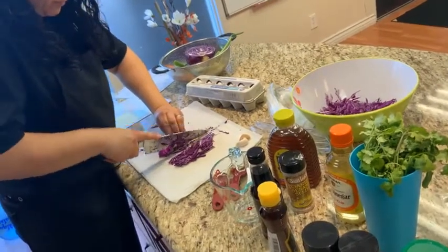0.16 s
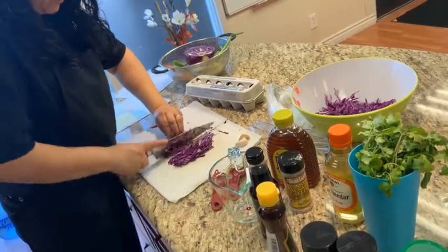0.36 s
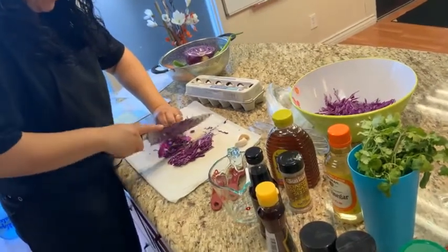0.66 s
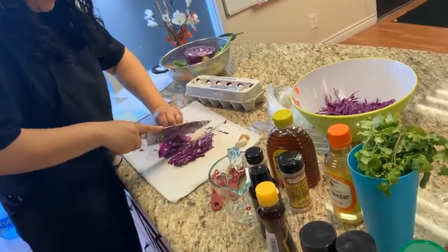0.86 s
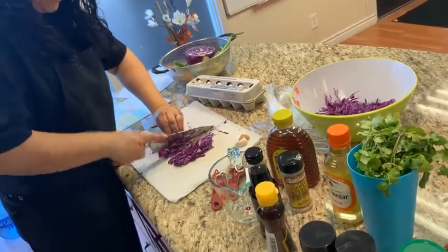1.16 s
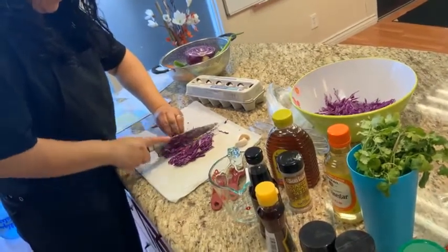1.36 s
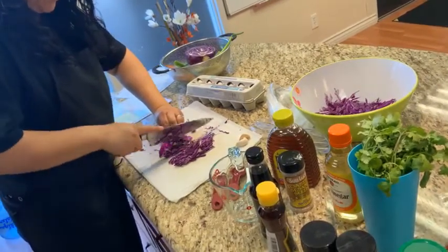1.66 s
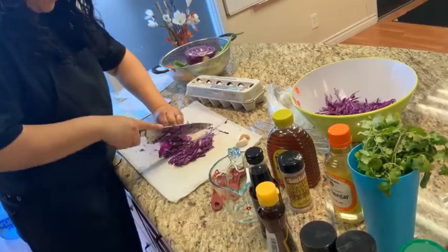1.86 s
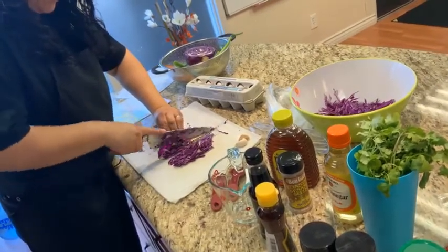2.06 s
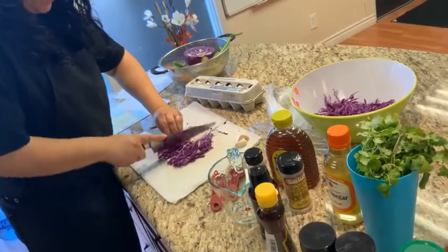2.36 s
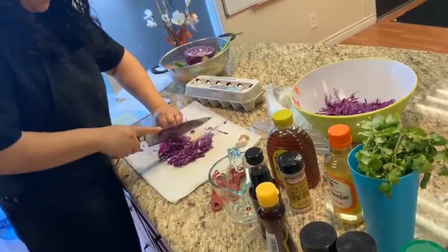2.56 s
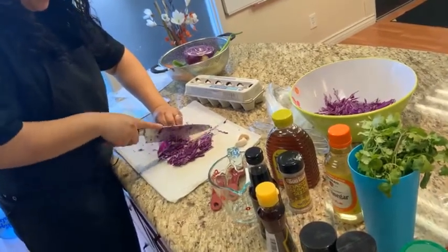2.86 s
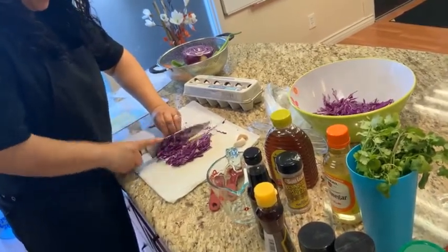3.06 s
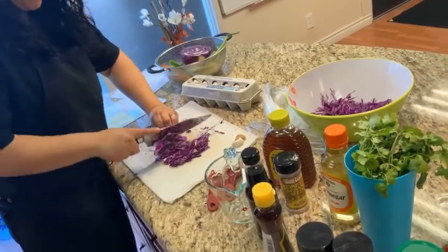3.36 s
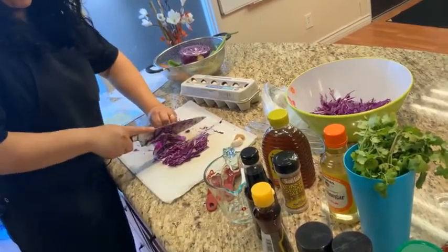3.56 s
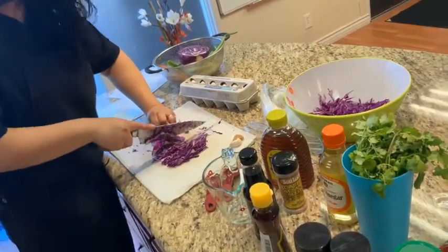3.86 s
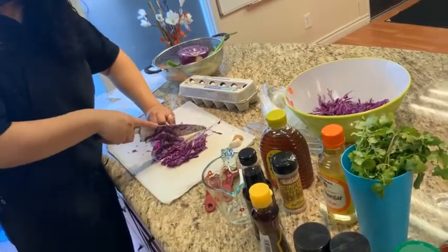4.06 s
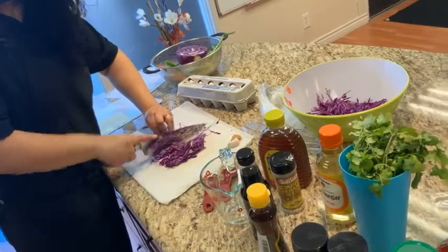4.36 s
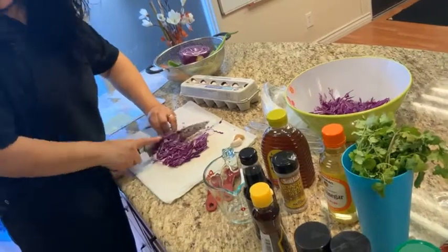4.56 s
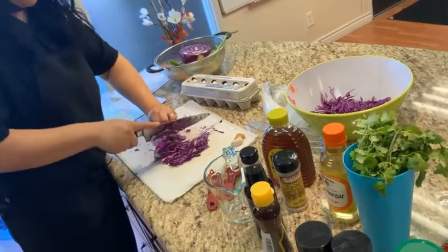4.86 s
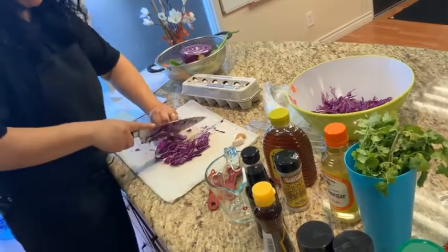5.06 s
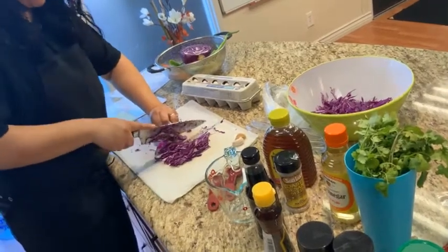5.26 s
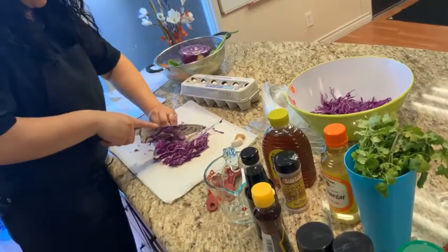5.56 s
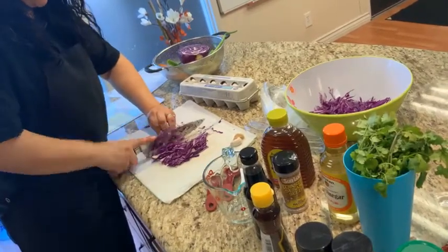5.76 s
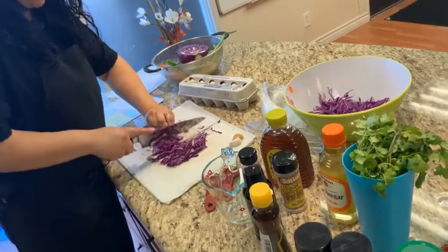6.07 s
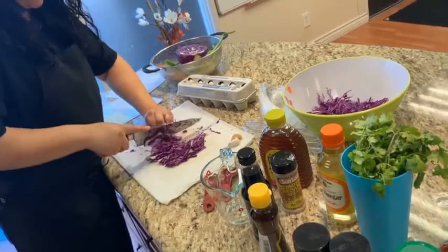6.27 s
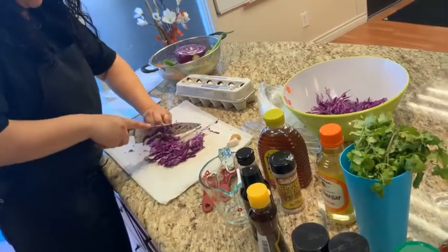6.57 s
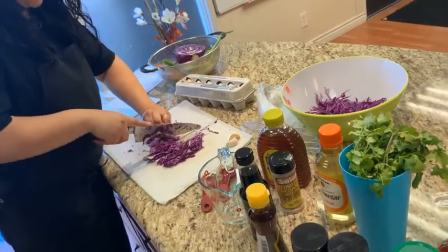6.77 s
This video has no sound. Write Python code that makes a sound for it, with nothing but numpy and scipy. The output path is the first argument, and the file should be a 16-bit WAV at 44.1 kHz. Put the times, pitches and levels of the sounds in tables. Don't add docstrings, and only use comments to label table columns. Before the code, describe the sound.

Close in a small hard-walled kitchen, a chef's knife cuts cabbage on a plastic board. Six short strokes crunch about a second apart, each a dense bright crackle with sharp snaps and dull edge knocks. Loose shreds rustle faintly between them. A fridge rumbles low and steadily throughout, heard on a phone about a metre away.

```python
import sys
import numpy as np
from scipy import signal
from scipy.fft import rfft, irfft
from scipy.io import wavfile
from scipy.ndimage import uniform_filter1d

SR = 44100
rng = np.random.default_rng(int(sys.argv[2]) if len(sys.argv) > 2 else 0)


def undo_db(level):
    steps = np.asarray(level, float) / 20
    return 10 ** steps


def transcribe(u):
    v = np.clip(np.atleast_2d(u).T, -1, 1)
    q = np.round(v * 32767).astype(np.int16)
    wavfile.write(sys.argv[1], SR, q)


N = 305172
T = np.arange(N) / SR

# start in seconds, length in seconds,
# crackle level in dB, change by the end in dB, ribs in dB re the crackle.
PUSHES = [
    (0.163, 0.11, -53.5, 9, -6.5),
    (1.154, 0.083, -48.5, 5, -5),
    (2.1, 0.089, -45, 1, -8),
    (3.003, 0.082, -45, 3, -8),
    (4.325, 0.099, -44, 0, -8),
    (5.699, 0.084, -40.5, 0, -11.5),
]
# start in seconds,
# length in seconds, crackle level in dB, change by the end in dB, ribs in dB re the crackle.
BITES = [(0.0, .016, -61, 4, -10), (0.33, .09, -68, -1, -6), (0.019, 0.082, -50.5, 3.5, -10),
         (0.115, 0.064, -60, 3, -5), (1.021, 0.031, -50, 5, -11), (1.068, 0.13, -53.5, 3, -5.5),
         (1.898, 0.071, -65, 17, -10), (1.976, 0.07, -55.5, -5, -8), (2.047, .055, -59.5, 13.5, -7),
         (2.843, 0.043, -67.5, 11.5, -16), (2.888, 0.038, -49.5, 2.5, -10.5),
         (2.938, 0.071, -54, 5.5, -5.5), (3.99, .012, -51.5, -3, -20), (4.02, 0.017, -43.5, -10, -18),
         (4.122, 0.021, -53.5, -2, -18), (4.164, 0.112, -57.5, 6, -12), (4.281, 0.058, -50.5, 0, -7.5),
         (5.37, 0.067, -70, 15.5, -14), (5.458, 0.11, -65.5, 4, -15), (5.554, .06, -50.5, -4, -13),
         (5.624, 0.068, -63, 10, -12), (5.675, 0.02, -46, 0, -13)]
# centre in Hz, width in Hz, level in dB.
POCKETS = [(6750, 1100, -7), (9500, 1100, -3), (12300, 1600, -2.5), (15300, 1100, 1.5)]
# frequency in Hz, density in dB per Hz.
LEAF_COLOUR = [(3500, -29), (5500, -4.5), (6500, -1.5), (8200, -0.5), (9600, 2), (11000, 0), (12300, 0),
               (15100, 4), (17000, -6.5)]
# frequency in Hz, density in dB per Hz.
RIB_COLOUR = [(1800, -25.5), (3000, -3.5), (3600, -2), (5200, -0.5), (7500, -24.5)]
# frequency in Hz, density in dB per Hz.
BOARD_COLOUR = [(300, -29.5), (700, -6), (1500, -2.5), (2400, -1.5), (3000, -3.5), (5000, -41)]
# start in seconds, peak in dB, colour in
# Hz.
SNAPS = [(0.0193, -33.5, 10600), (0.047, -26, 11900), (0.0846, -33, 10900), (0.175, -29, 9300),
         (0.2487, -31, 10400), (1.023, -35, 12800), (1.0562, -25, 11200), (1.1643, -28.5, 9100),
         (1.219, -30, 11600), (1.9622, -34, 13000), (1.973, -26, 10100), (2.028, -31.5, 10000),
         (2.107, -30.5, 12400), (2.134, -26, 11000), (2.8894, -27.5, 11000), (2.9746, -38, 9400),
         (3.0039, -31, 12200), (3.035, -32, 12300), (3.9964, -32, 11500), (4.0226, -22.5, 10100),
         (4.027, -36, 10000), (4.1246, -37, 12000), (4.282, -33.5, 12600), (4.3262, -26.5, 9500),
         (4.3384, -27, 10700), (4.4126, -28, 10200), (5.5606, -29.5, 11500), (5.608, -37, 10000),
         (5.681, -23, 10600), (5.7137, -26, 11100)]
# start in seconds, peak in dB.
SPLINTERS = [(0.0256, -36), (0.089, -35), (0.1053, -42), (0.2446, -31), (1.032, -39), (1.1675, -35),
             (1.976, -28.5), (2.0779, -40), (2.157, -29), (2.1647, -26), (2.1872, -38), (2.9263, -40),
             (3.0322, -30), (3.077, -33), (3.205, -50), (3.265, -54), (4.1593, -45), (4.211, -34),
             (4.3429, -32), (4.3882, -29), (5.4068, -45), (5.5412, -44), (5.564, -40), (5.5732, -36),
             (5.5844, -38), (5.77, -32), (5.7856, -43), (6.5373, -45)]
# start in seconds, peak in dB, colour in Hz.
TICKS = [(0.3714, -58, 7380), (0.728, -38, 10200), (0.7336, -39, 13100), (0.7871, -42, 10700),
         (0.8515, -42, 9500), (0.8994, -54, 9540), (0.9398, -49, 9000), (0.9804, -47, 9500),
         (1.6489, -47, 10300), (1.7689, -42.5, 12000), (1.863, -31.5, 10000), (2.577, -54, 8290),
         (2.7445, -51, 10300), (2.7871, -48, 9250), (2.864, -47, 10400), (3.5102, -42.5, 11200),
         (3.7791, -52, 12900), (4.14, -37, 7900), (4.2305, -37, 11200), (4.6115, -51, 8700),
         (5.4209, -37, 12600), (5.4932, -45, 11700), (5.9481, -45, 12000), (5.9868, -50, 9220),
         (6.1987, -54, 8700), (6.2297, -49, 9580), (6.5231, -41, 11200), (6.5942, -42.5, 9800),
         (6.769, -50, 5700), (6.801, -50, 11300)]
# start in seconds, peak in dB, flexing frequency in Hz.
KNOCKS = [(0.0797, -37, 2330), (0.1119, -34.5, 1740), (0.1744, -40, 2230), (0.2652, -37.5, 1890),
          (0.375, -42, 1570), (1.0561, -30, 1420), (1.167, -49, 1440), (1.2398, -41, 1590),
          (1.2464, -40, 1560), (1.976, -30.5, 1780), (2.1771, -45, 1170), (2.232, -46, 1290),
          (2.864, -49, 1400), (2.9312, -34.5, 1730), (3.0053, -54, 2090), (3.0713, -42, 1570),
          (4.048, -44.5, 1670), (4.1393, -34.5, 1790), (4.283, -43, 1690), (4.3257, -47, 2970),
          (4.4162, -46, 1400), (4.681, -46.5, 1130), (5.5345, -47.5, 1730), (5.56, -39, 1060),
          (5.758, -49, 1190), (5.7931, -37.5, 2000), (5.947, -51, 1120), (5.9918, -46, 1200)]
# start in seconds, end in seconds, centre in Hz, rms level in dB.
GROANS = [
    (5.70, 5.82, 296, -51.5),
    (3.0, 3.1, 570, -56.5),
    (4.32, 4.44, 514, -57),
]
# start in seconds, length in seconds,
# crackle level in dB, change by the end in dB, colour in Hz.
RUSTLES = [(0.714, 0.018, -65.5, 4, 9000), (0.76, 0.31, -74.5, 9, 10100), (1.61, .045, -81, 8, 9000),
           (1.66, .09, -79, -2, 13000), (1.757, .022, -66, -2, 13500), (1.804, 0.081, -73, 6, 11000),
           (2.571, 0.014, -64.5, -0.5, 8500), (2.612, 0.14, -82, -1, 12000), (2.741, 0.029, -69, 0, 11000),
           (2.781, 0.016, -64.5, 0, 9500), (3.48, 0.036, -77, 8, 11000), (3.55, 0.29, -81.5, 8, 12000),
           (3.868, .12, -79, 10.5, 10000), (4.055, 0.066, -63, -5, 13000), (4.6, .1, -73.5, 1, 5970),
           (4.72, 0.48, -81, -2, 13000), (5.22, 0.19, -86, 12, 10000), (5.938, .055, -72, 0, 13000),
           (6.056, 0.2, -87, 13, 11000), (6.273, .18, -85, -2, 13500), (6.46, 0.063, -77, 15, 12500),
           (6.523, 0.1, -66.5, -6, 12000), (6.627, 0.16, -75.5, -5, 11000), (6.79, .022, -68, -2, 14000)]
# frequency in Hz, density in dB per Hz.
AIR_COLOUR = [(22, -29.5), (45, -23), (90, -6.5), (150, -15.5), (200, -20.5), (500, -24), (750, -34),
              (1300, -37.5), (1600, -42), (4000, -51.5), (5800, -58), (7600, -64.5), (9600, -72),
              (15500, -66)]
# frequency in Hz, width in Hz, rms level in dB.
ROOM_MODES = [(59.5, 9.7, -57), (75.36, 5.9, -53), (96.25, 11.2, -50), (122.6, 8.9, -57), (142, 17.6, -59),
              (233.8, 13.6, -61), (289, 9, -74.5)]
# time in seconds, rumble level in dB.
RUMBLE_SWELL = [(0, -45.5), (.7, -45.5), (1.3, -45.5), (2, -45), (2.8, -45.5), (3.6, -46), (4.4, -47.5), (5.2, -46),
                (6, -45), (6.92, -44.5)]
# frequency in Hz, rms level in dB.
MOTOR = [(412.8, -82), (495.4, -69.5), (827.0, -78)]
# multiple of the mains, rms level in dB.
BUZZ = [(12, -80), (16, -78), (20, -81), (22, -72), (30, -83), (40, -87), (48, -88), (56, -87), (98, -88)]
# frequency in Hz, rms level in dB a line.
BUZZ_COMB = [(900, -100), (2000, -91), (4000, -95), (4900, -101), (5700, -90.5), (6600, -102), (8500, -107),
             (9600, -100), (11000, -108), (12500, -103), (15000, -109)]

ATTACK_S, RELEASE_DB_PER_S = 0.002, 600
SETTLE_DB, SETTLE_DB_PER_S = -20.5, 90
PUSH_PEAK_SHARE = 0.94
BOARD_DB, BOARD_FOLLOWS_RIBS, BOARD_NEARING_DB = -10, 0.41, 3
SPLINTER_HZ = 10500
RATTLE_DB, THUD_DB = -11.5, -16.5
RUSTLE_RIBS_DB, RUSTLE_ATTACK_S, RUSTLE_RELEASE_DB_PER_S = -7.5, 0.008, 450
ROOM_T60_S, ROOM_DB = 0.84, -15.5
AIR_DB, MAINS_HZ = -50, 59.99
TOP_HZ = 15700


def level(x, db):
    return x * undo_db(db) / np.sqrt(np.mean(x ** 2))


def colour(x, points):
    hz, db = np.transpose(points)
    f = np.maximum(np.fft.rfftfreq(4096, 1 / SR), 1)
    log_gain = np.interp(np.log(f), np.log(hz), db) * np.log(10) / 20
    cepstrum = irfft(log_gain)
    cepstrum[1:2048] *= 2
    cepstrum[2049:] = 0
    impulse = irfft(np.exp(rfft(cepstrum)))
    return signal.fftconvolve(x, impulse)[:len(x)]


def band(x, hz, width_hz):
    b, a = signal.iirpeak(min(hz, 0.45 * SR), hz / width_hz, fs=SR)
    return signal.lfilter(b, a, x)


def walk(rate):
    hold = max(int(SR / rate), 1)
    steps = rng.standard_normal(N)[np.arange(N) // hold]
    return 1.7 * uniform_filter1d(uniform_filter1d(steps, hold), hold)


def add(out, s, sound):
    i = int(s * SR)
    out[i:i + len(sound)] += sound[:N - i]


def cracks(spread_db, flicker_db, flicker_rate):
    rank = np.minimum(rng.exponential(size=N), 5.5)
    return rng.standard_normal(N) * undo_db(spread_db * rank + flicker_db * walk(flicker_rate))


def tear(start, length, db, change_db, attack_s, release_db_per_s, peak_share=1):
    t = T[:min(int((length + 0.4) * SR), N - int(start * SR))]
    depth = np.minimum(t / length, 1)
    after = np.maximum(t - length, 0)
    opening = 1 - np.exp(-t / attack_s)
    growth = undo_db(db + change_db * np.minimum(depth / peak_share, 1))
    release = undo_db(-release_db_per_s * after) + undo_db(SETTLE_DB - SETTLE_DB_PER_S * after)
    return opening * growth * release, depth


def tearing_force():
    power = np.ones((3, N)) * undo_db([[-180], [-180 + 2 * RUSTLE_RIBS_DB], [-240]])
    strokes = ((PUSHES, PUSH_PEAK_SHARE, BOARD_NEARING_DB), (BITES, 1, 0))
    for rows, peak_share, nearing_db in strokes:
        for start, length, db, change_db, rib_db in rows:
            leaf, depth = tear(start, length, db, change_db, ATTACK_S, RELEASE_DB_PER_S, peak_share)
            board_db = BOARD_DB + BOARD_FOLLOWS_RIBS * rib_db + nearing_db * depth
            for layer, gain in zip(power, (1, undo_db(rib_db), undo_db(board_db))):
                add(layer, start, (gain * leaf) ** 2)
    return np.sqrt(power)


def cutting(force):
    tearing = cracks(3.0, 1.46, 150.0)
    pockets = np.zeros(N)
    for hz, width_hz, db in POCKETS:
        pops = cracks(2.5, 0.8, 120.0) * undo_db(4 * walk(24.98))
        pockets += level(band(pops, hz, width_hz), db)
    leaves = level(level(colour(tearing, LEAF_COLOUR), 0) + 0.39 * pockets, -0.87)
    ribs = level(colour(0.76 * tearing + cracks(3.7, 1.15, 100.0), RIB_COLOUR), -1.5)
    board = level(colour(0.57 * tearing + cracks(3.0, 1.3, 90.0), BOARD_COLOUR), -0.25)
    return np.sum(force * [leaves, ribs, board], axis=0)


def snaps(force):
    out, t = np.zeros(N), T[:1800]
    breaks = SNAPS + TICKS + [(s, db, SPLINTER_HZ) for s, db in SPLINTERS]
    spray = rng.standard_normal((len(breaks), len(t)))
    thickness = force[1] / force[0]
    for (s, db, hz), noise in zip(breaks, spray):
        snap = np.sign(noise) * np.exp(-t / 0.00022)
        burst = snap + noise * undo_db(-17.5) * np.exp(-t / 0.0052)
        tint = band(band(burst, hz, 0.86 * hz), hz, 0.86 * hz) + 0.3 * colour(burst, LEAF_COLOUR)
        thick = thickness[int((s + 0.003) * SR)] * colour(burst, RIB_COLOUR)
        sound = tint / np.abs(tint).max() + 1.9 * thick
        add(out, s, undo_db(db - 1.25) * sound)
    return out


def knocks():
    out, t = np.zeros(N), T[:6600]
    chance = rng.standard_normal((len(KNOCKS), 2, len(t)))
    rattle_decay = undo_db(-60 * t / 0.067) * (1 - np.exp(-t / 0.0012))
    thud_decay = undo_db(-60 * t / 0.093) * (1 - np.exp(-t / 0.003))
    for (s, db, hz), (shake, bump) in zip(KNOCKS, chance):
        swings = t * hz / 0.41
        flex = swings * np.exp(1 - swings) * np.sin(2 * np.pi * hz * t)
        rattle = level(band(shake, 0.89 * hz, 1.0 * hz), RATTLE_DB) * rattle_decay
        thud = level(band(bump, 260.0, 330.0), THUD_DB) * thud_decay
        add(out, s, undo_db(db + 0.1) * (flex + rattle + thud))
    return out


def leaning():
    out = np.zeros(N)
    for start, end, hz, db in GROANS:
        push = np.sin(np.pi * np.clip((T - start) / (end - start), 0, 1))
        out += push * level(band(rng.standard_normal(N), hz, 0.17 * hz), db)
    return out


def rustling():
    out = np.zeros(N)
    grains = cracks(2.5, 1.6, 90.0)
    leaves = level(colour(grains, LEAF_COLOUR), 0) + level(colour(grains, RIB_COLOUR), RUSTLE_RIBS_DB)
    for start, length, db, change_db, hz in RUSTLES:
        gain, _ = tear(start, length, db, change_db, RUSTLE_ATTACK_S, RUSTLE_RELEASE_DB_PER_S)
        piece = leaves[int(start * SR):][:len(gain)]
        add(out, start, gain * level(band(piece, hz, 0.84 * hz) + 0.35 * piece, 0))
    return out


def kitchen(x):
    t = T[:SR // 2]
    noise = rng.standard_normal(len(t))
    low = signal.lfilter([0.35], [1, -0.65], noise)
    high = noise - low
    wash = low * undo_db(-60 * t / ROOM_T60_S) + high * undo_db(-60 * t / (0.23 * ROOM_T60_S))
    wash *= 1 - np.exp(-t / 0.0013)
    wash *= undo_db(ROOM_DB) / np.sqrt(np.sum(wash ** 2))
    return x + signal.fftconvolve(x, wash)[:N]


def rumble():
    air = level(colour(rng.standard_normal(N), AIR_COLOUR), AIR_DB)
    for hz in 3200 * 1.25 ** np.arange(8):
        air = air + band(air, hz, 0.23 * hz) * (undo_db(1.8 * walk(7.0)) - 1)
    modes = []
    for hz, width_hz, db in ROOM_MODES:
        mode = band(band(rng.standard_normal(N), hz, width_hz), hz, width_hz)
        modes.append(level(mode, db))
    bass = sum(modes[:5]) * undo_db(0.74 * walk(16.0))
    own_swell = np.sqrt(uniform_filter1d(bass ** 2, int(0.3 * SR)) / np.mean(bass ** 2))
    s, db = np.transpose(RUMBLE_SWELL)
    slow_swell = undo_db(np.interp(T, s, db - db.mean()))
    return air + bass / own_swell * slow_swell + sum(modes[5:])


def tone(hz, db, waver_db):
    phase = 2 * np.pi * (hz * T + rng.random())
    return np.sqrt(2) * undo_db(db + waver_db * walk(5.0)) * np.sin(phase)


def fridge():
    whine = sum(tone(hz, db, 2.2) for hz, db in MOTOR)
    buzz = sum(tone(k * MAINS_HZ, db, 1.0) for k, db in BUZZ)
    hz, db = np.transpose(BUZZ_COMB)
    comb = np.zeros(N // 2 + 1, complex)
    for k in set(range(14, 250)) - set(dict(BUZZ)):
        odd_db = -4.2 * (k % 2)
        line_db = np.interp(k * MAINS_HZ, hz, db) + 2.6 * rng.standard_normal() + odd_db
        turn = np.exp(2j * np.pi * rng.random())
        comb[round(k * MAINS_HZ * N / SR)] = undo_db(line_db) * N / np.sqrt(2) * turn
    return whine + buzz + irfft(comb, N)


def scene():
    force = tearing_force()
    worktop = cutting(force) + snaps(force) + knocks() + leaning() + rustling()
    mono = kitchen(worktop) + rumble() + fridge()
    return np.array([mono, mono])


def low_pass(x):
    return signal.sosfilt(signal.butter(12, 16840, fs=SR, output="sos"), x)


def record(dry):
    top = signal.ellip(10, 0.2, 60, TOP_HZ, fs=SR, output="sos")
    return low_pass(signal.sosfilt(top, dry))


dry = scene()
out = record(dry)
transcribe(out)
```